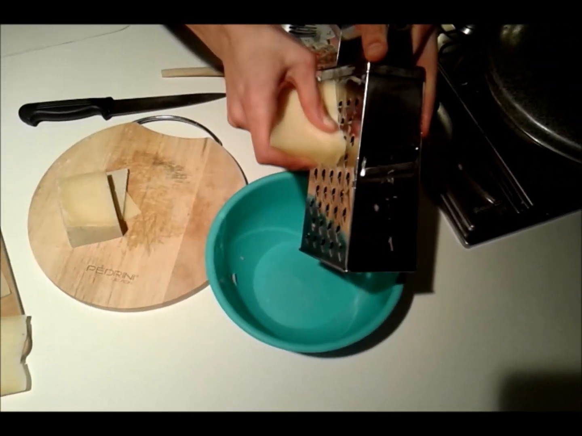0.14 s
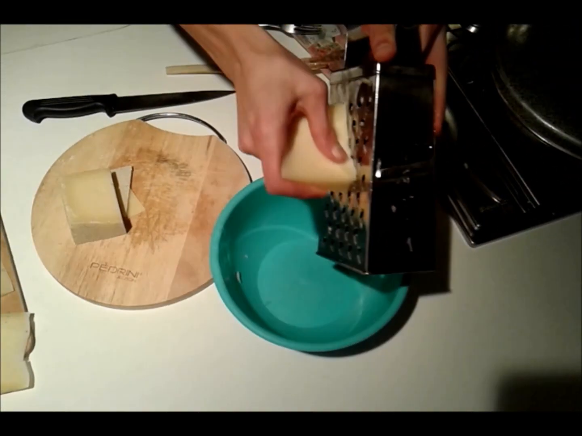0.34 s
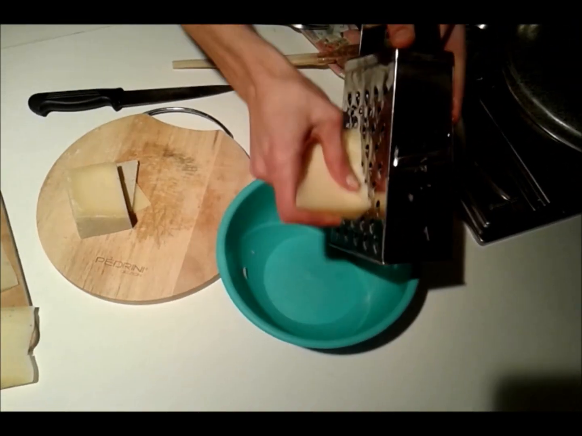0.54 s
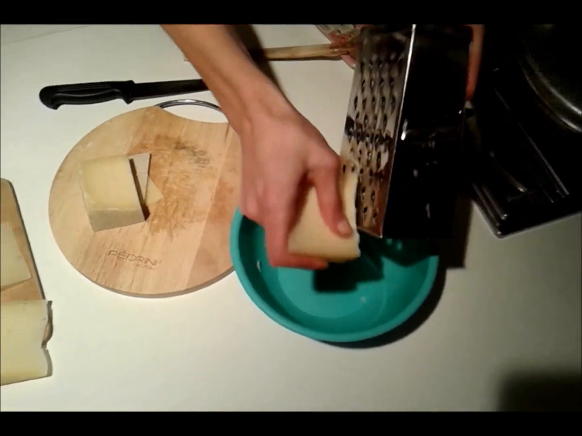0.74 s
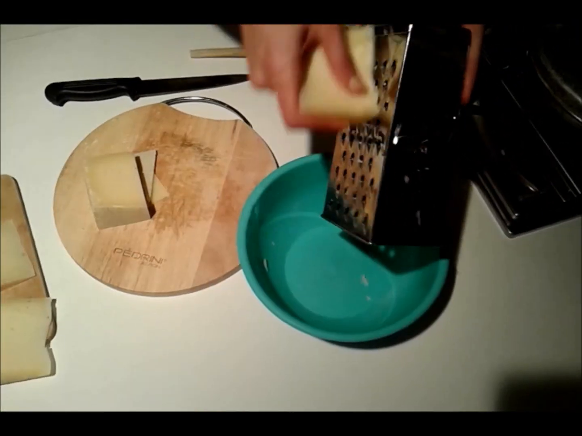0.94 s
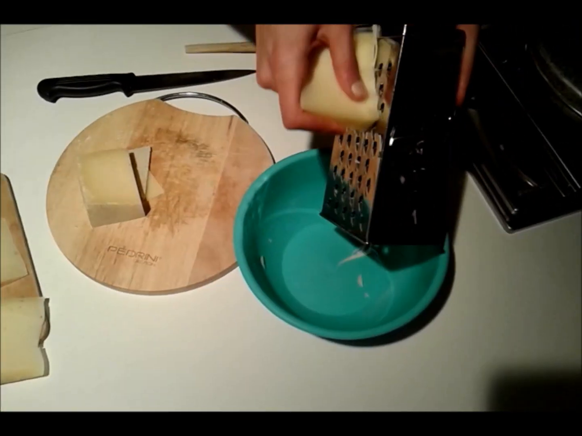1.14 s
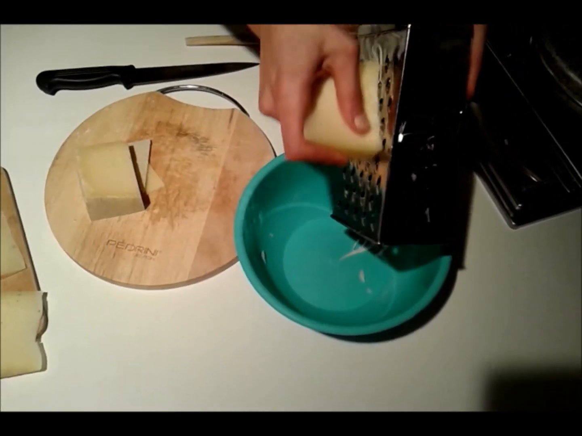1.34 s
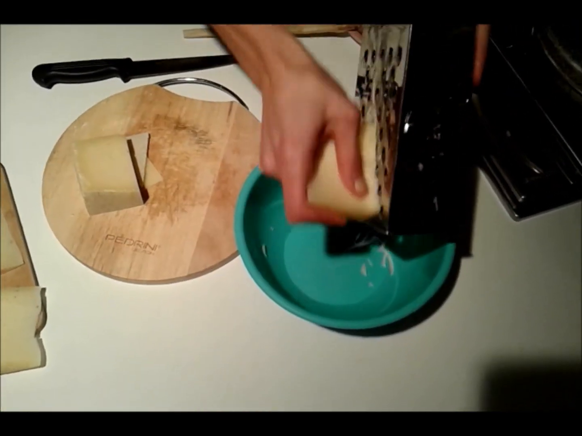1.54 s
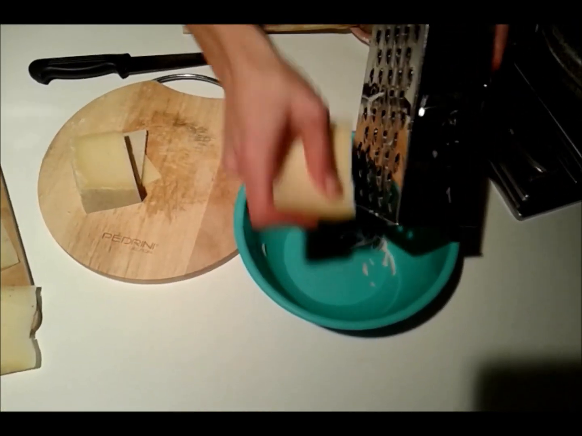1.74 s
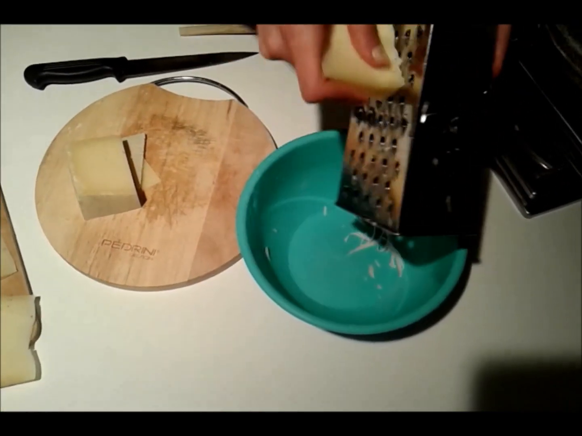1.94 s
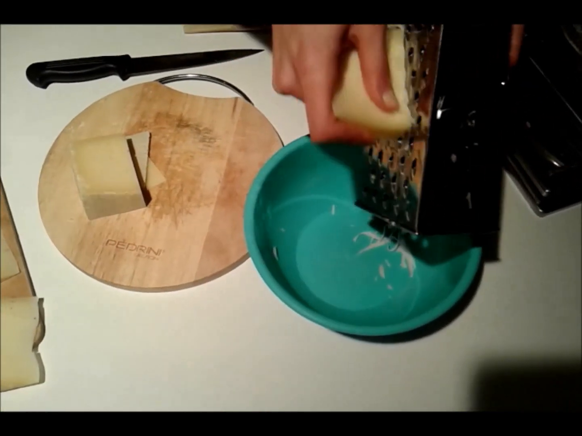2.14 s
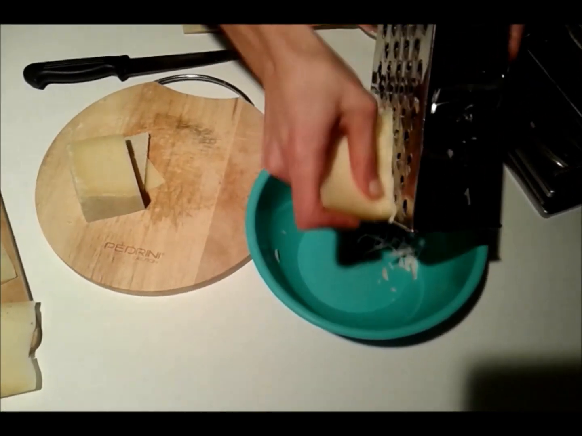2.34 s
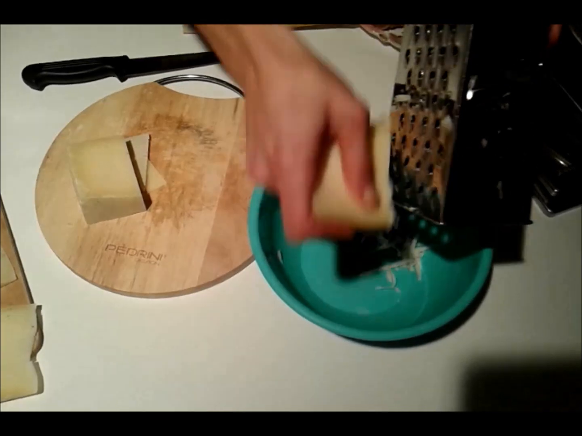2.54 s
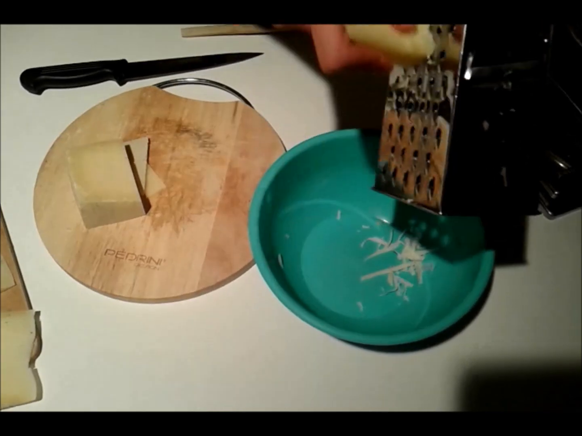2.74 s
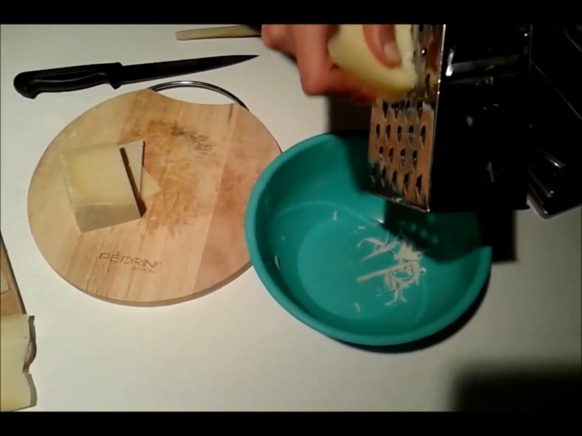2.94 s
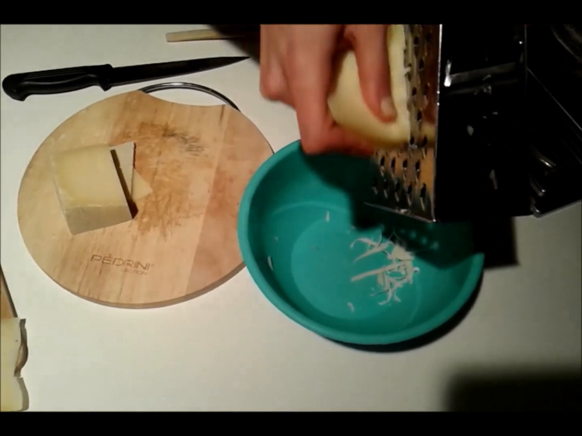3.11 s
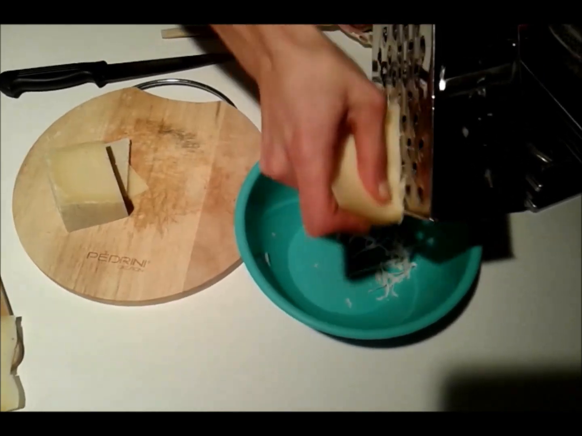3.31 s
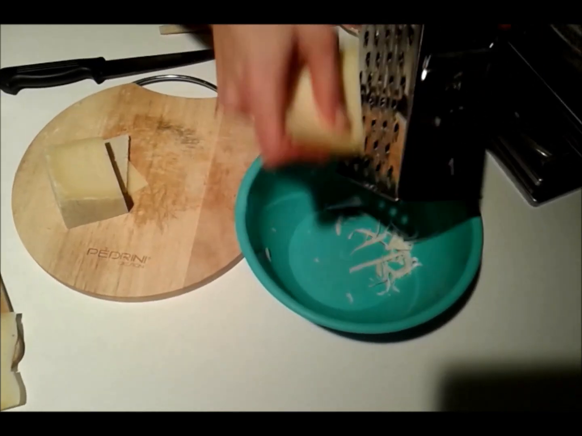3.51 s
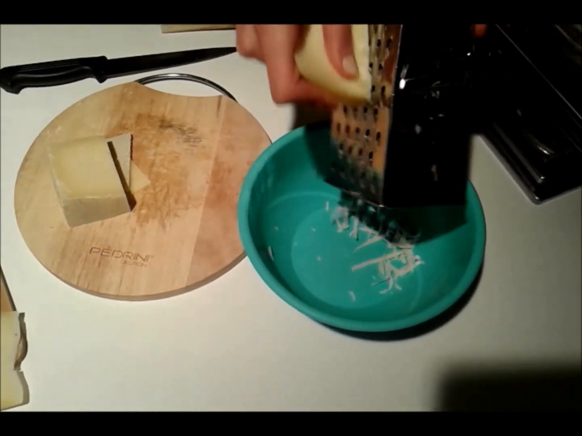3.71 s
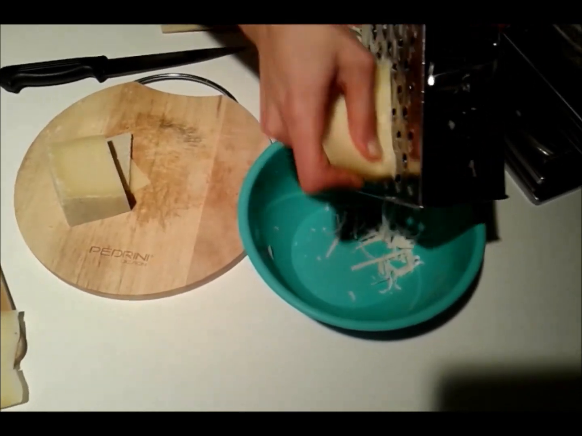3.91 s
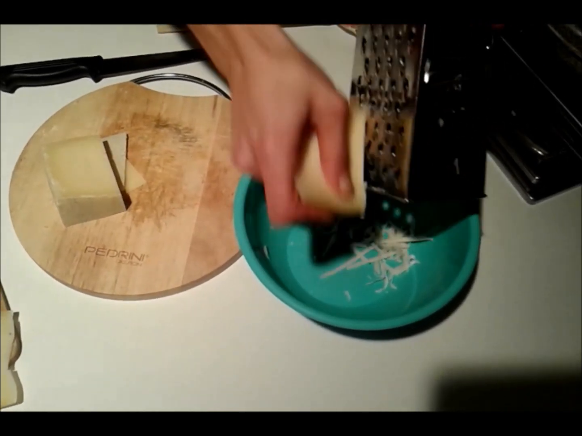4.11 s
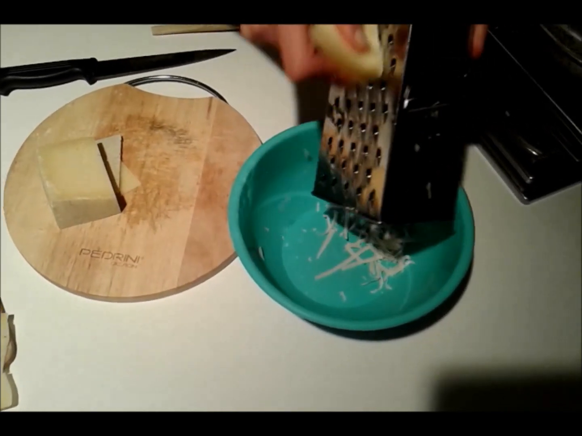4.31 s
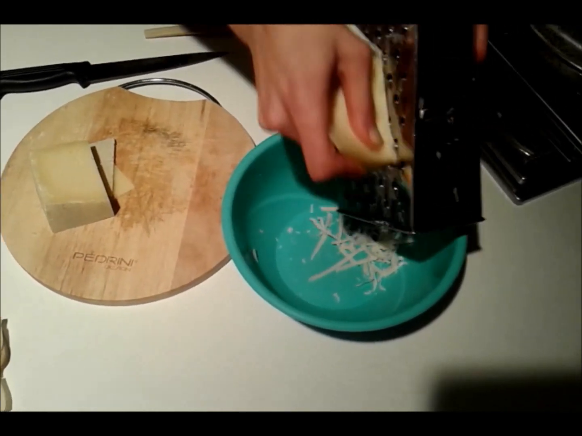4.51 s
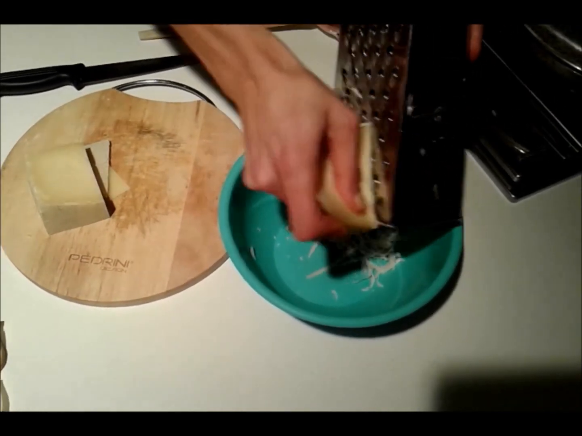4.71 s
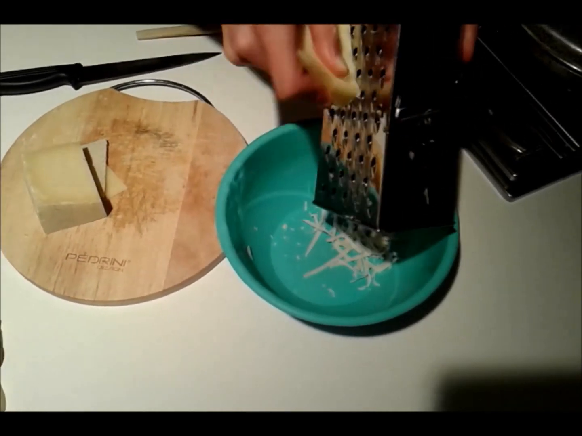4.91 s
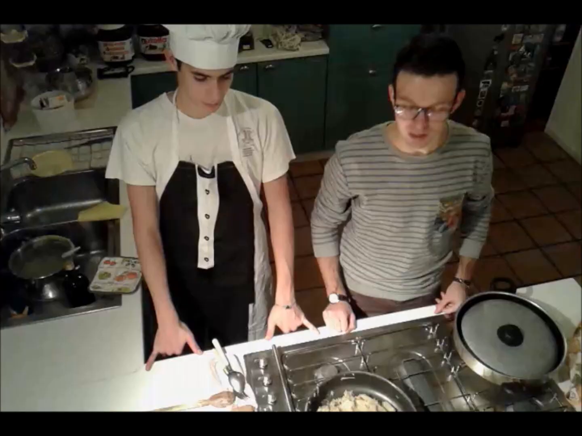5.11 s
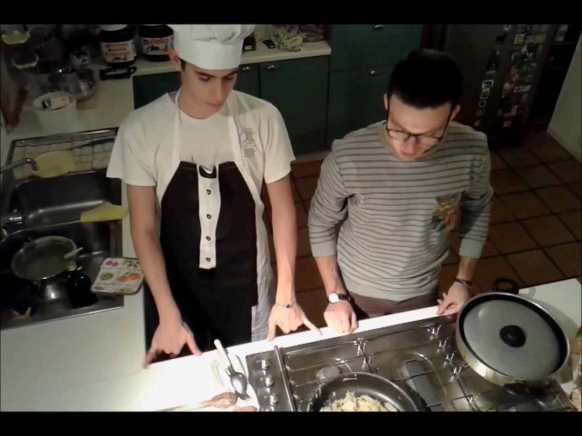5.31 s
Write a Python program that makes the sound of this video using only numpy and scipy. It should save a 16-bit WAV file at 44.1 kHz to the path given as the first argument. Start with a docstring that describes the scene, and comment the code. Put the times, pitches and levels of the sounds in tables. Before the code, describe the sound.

Hard cheese rasps down a steel grater in uneven strokes, with bright ticks and light knocks against a plastic bowl.

```python
"""A block of hard cheese is stroked down a steel box grater standing in a plastic bowl on a counter.
Crumbs break on the teeth in a fine rasp; the block catches and snaps free in bright ticks that ring
the steel, and now and then it splits with a thin crack. The side wall flexes with dull ticks and the
grater's foot knocks in the bowl. A small hard kitchen rings after each tick. Underneath lie a steady
hiss and two faint, brief tones; the sound stops abruptly in mid-stroke."""
import sys
import numpy as np
from scipy import signal
from scipy.fft import rfft, irfft
from scipy.io import wavfile
from scipy.ndimage import uniform_filter1d

SR = 44100
rng = np.random.default_rng(int(sys.argv[2]) if len(sys.argv) > 2 else 0)


def to_wav(s):
    """Save 16-bit WAV."""
    ch = np.atleast_2d(s).T  # columns
    pcm = np.round(np.clip(ch, -1, 1) * 32767)  # PCM
    wavfile.write(sys.argv[1], SR, pcm.astype(np.int16))


N = 240477
TIME = np.arange(N) / SR
EVENT_TIME = TIME[:SR // 4]  # time axis of one hit and its tail [s]
USUAL_DB = -40  # a typical catch: the reference for drag and smear levels


def undb(db):
    """Decibels to gain."""
    return 10 ** (np.asarray(db) / 20)


def unit(x):
    """Scale to rms 1."""
    return x / np.sqrt(np.mean(x ** 2))


def crest(x, size=128):
    """Scale so that the loudest stretch of `size` samples has rms 1."""
    return x / np.sqrt(uniform_filter1d(x ** 2, size).max())


def add(track, start_s, x):
    """Mix x into the track from start_s."""
    i = max(int(start_s * SR), 0)
    track[i:i + len(x)] += x[:N - i]


def through(x, response):
    """Pass x through an impulse response."""
    return signal.fftconvolve(x, response)[:len(x)]


def highpass(x, hz):
    """Second-order low cut."""
    return signal.sosfilt(signal.butter(2, hz, "high", fs=SR, output="sos"), x)


def low_noise(count, hz):
    """White noise rolled off above hz."""
    return signal.sosfilt(signal.butter(2, hz, fs=SR, output="sos"), rng.standard_normal(count))


def wander(count, hz):
    """Slow random modulation at rms 1."""
    return unit(low_noise(count, hz))


def colour(points, size=1024):
    """Minimum-phase impulse response of an EQ curve of (frequency [Hz], level [dB]) points."""
    hz, db = np.transpose(points)
    grid_hz = np.maximum(np.arange(size // 2 + 1) * SR / size, 1)
    gain = undb(np.interp(np.log(grid_hz), np.log(hz), db))
    cepstrum = irfft(np.log(gain))
    cepstrum[1:size // 2] *= 2
    cepstrum[size // 2 + 1:] = 0
    return irfft(np.exp(rfft(cepstrum)))


def ring(modes, gain_db=0, longest_t60_s=.14):
    """Decaying modes at rms 1; every ring dies quickly, with t60 capped at longest_t60_s."""
    hz, db, t60 = np.transpose(modes)
    phase = 2 * np.pi * (np.outer(EVENT_TIME, hz) + rng.random(len(hz)))
    fade = np.exp(-np.log(1000) * EVENT_TIME[:, None] / np.clip(t60, .005, longest_t60_s))
    return unit(np.sum(undb(db + gain_db) * np.sin(phase) * fade, axis=1))


def resonator(points, modes, ring_share):
    """Unit-energy impulse response of a part: a broad colour with its clearest modes ringing on."""
    broad = colour(points)
    broad = np.pad(broad, (0, len(EVENT_TIME) - len(broad)))
    return unit(unit(broad) + ring_share * ring(modes)) / np.sqrt(len(EVENT_TIME))


def steel(points, modes, ring_share, detune=.03):
    """The block loads a steel face at another place on each contact and shifts its modes."""
    shifted = np.array(modes, float)
    shifted[:, 0] *= 1 + detune * rng.standard_normal(len(modes))
    return resonator(points, shifted, ring_share)


def crumbs(count, per_s, spread_db):
    """Tiny fractures at random moments, a few much stronger than the rest."""
    breaks = rng.random(count) < per_s / SR
    polarity = rng.choice([-1, 1], count)
    return breaks * polarity * undb(spread_db * np.minimum(rng.exponential(size=count), 4))


# EQ of the background bed: (frequency [Hz], relative level [dB])
HISS_EQ = [(25, -5), (70, -9.5), (150, -9), (350, -5), (600, -6), (1200, -15), (3000, -17), (6000, -14.5),
           (8400, -9), (11000, -19.5), (16000, -21.5)]
def hiss(level_db=-70.5):
    """A faint, steady bed of coloured noise."""
    return undb(level_db) * unit(through(rng.standard_normal(N), colour(HISS_EQ)))


# tones under the first light rubs: (peak time [s], pitch [Hz], level [dB], half length [s])
TONE_CUES = [(0.199, 656, -64, 0.058), (0.52, 552, -62.5, 0.039)]
def faint_tones(waver_hz=18, waver_share=0.33):
    """Wavering sine tones swell and fade."""
    waver = 1 + waver_share * wander(N, waver_hz)
    out = np.zeros(N)
    for peak_s, hz, db, width_s in TONE_CUES:
        swell = np.exp(-((TIME - peak_s) / width_s) ** 2)
        out += undb(db) * np.sqrt(2) * np.sin(2 * np.pi * hz * TIME) * swell
    return waver * out


def kitchen(x, build_s=0.012, split_hz=2500, low_t60_s=0.3, high_t60_s=0.28, low_db=-12, high_db=-14.5):
    """Add dense reflections from tiles and cupboards, with their own decay for lows and highs."""
    lows = low_noise(SR, split_hz)
    highs = highpass(rng.standard_normal(SR), split_hz)
    t, response = TIME[:SR], 0
    for band, t60, db in (lows, low_t60_s, low_db), (highs, high_t60_s, high_db):
        fade = (1 - np.exp(-t / build_s)) * np.exp(-np.log(1000) * t / t60)
        response = response + undb(db) * band * fade / np.sqrt(np.sum(fade ** 2))
    return x + through(x, response)


# EQ of the bowl's thud: (frequency [Hz], relative level [dB])
BOWL_EQ = [(40, -47.5), (90, -19), (150, -4.5), (210, -15), (330, -14), (520, -0.5), (750, 0.5), (1100, -6),
           (1500, -2), (2300, -4.5), (5000, -18), (12000, -77.5)]
# the bowl's resonances: (frequency [Hz], relative level [dB], t60 [s], capped in ring())
BOWL_RING = [(285.2, -6.5, 0.079), (349.7, -10, 0.17), (386.7, -6.5, 0.14), (518, 4, 0.069),
             (541, -6, 0.33), (571, -5.5, 0.23), (670, -15.5, 0.054), (756, -22, 0.033), (800, 2, 0.02),
             (914, -9, 0.079), (984, -11.5, 0.07), (1071.3, 2, 0.059), (1200, -32.5, 0.042),
             (1553, -19, 0.2), (1402, -5.5, 0.09), (1745, -11, 0.18)]
def plastic_bowl():
    """The hollow response of the bowl with the grater standing in it."""
    return resonator(BOWL_EQ, BOWL_RING, ring_share=0.47)


# EQ of the side wall: (frequency [Hz], relative level [dB])
WALL_EQ = [(300, -46.5), (900, -5), (1500, -12.5), (2000, 6), (2500, 6.5), (3200, 6), (4200, 4),
           (5500, 2.5), (7500, 4), (10000, -17), (16000, -15)]
# the wall's resonances: (centre frequency [Hz], relative level [dB], t60 [s])
WALL_RING = [(2620, -30.5, 0.012), (2736, 17.5, 0.007), (3160, 2.5, 0.1), (3770, -4, 0.044),
             (4100, 4, 0.0067), (5300, 17.5, 0.017), (5506, 3.5, 0.01)]
def side_wall(ring_share=0.23):
    """The flat steel wall answers one contact with a short clank."""
    return steel(WALL_EQ, WALL_RING, ring_share)


# EQ of the teeth: (frequency [Hz], relative level [dB])
TEETH_EQ = [(1000, -42), (3000, -27), (4700, -17), (5800, -8), (6500, -7), (7400, -2.5), (8200, 0),
            (8850, -1), (9400, -7), (9900, -9), (10700, -15), (12000, -28), (16000, -37)]
# the punched face's resonances: (centre frequency [Hz], relative level [dB], t60 [s])
TEETH_RING = [(6450, -12, .04), (6660, -30.5, 0.1), (7640, 5, 0.03), (7900, 12.5, 0.029), (8300, 7, 0.076),
              (9300, 3, 0.12), (9570, -13, .04)]
def toothed_face():
    """The punched steel face answers one contact with a bright ping."""
    return steel(TEETH_EQ, TEETH_RING, ring_share=0.23)


def rasp(bowl, t, length_s, teeth_db, body_db, bowl_db=-3, grip_s=0.0054, release_s=0.011):
    """Cheese crumbles in small clumps over many teeth and shakes the body: side wall and bowl."""
    contact = (1 - np.exp(-t / grip_s)) * np.exp(-np.maximum(t - length_s, 0) / release_s)
    fractures = crumbs(len(t), per_s=4000, spread_db=2.5)
    clump_db = 1.5 * wander(len(t), hz=110)
    grains = contact * unit(fractures * undb(clump_db))
    teeth = through(grains * undb(teeth_db), toothed_face())
    body = through(grains * undb(body_db), side_wall() + undb(bowl_db) * bowl)
    # cheese smeared over flat steel adds an airy hiss that grows only slowly with the drag
    smear_db = -60 + 0.2 * (body_db - USUAL_DB)
    smear = contact * highpass(rng.standard_normal(len(t)), hz=6000) * undb(smear_db)
    return teeth + body + smear


def accent_db(hz, centre_hz, boost_db=8, width_octaves=0.8):
    """The place of contact favours the modes near one frequency."""
    return boost_db * np.exp(-(np.log2(hz / centre_hz) / width_octaves) ** 2)


# the grater's foot hits the bowl: (time [s], level [dB], accented frequency [Hz])
KNOCK_CUES = [(0.840, -40.5, 1040), (1.073, -39, 620), (1.228, -53.5, 870), (1.711, -46.5, 613),
              (2.063, -42, 380), (2.530, -51, 1130), (3.736, -33, 590), (3.916, -44, 920),
              (4.382, -38.5, 496), (4.678, -44.5, 376), (4.804, -37, 1500), (5.013, -28, 1000)]
def foot_knocks(bowl, chatter_db=-8.5, contact_s=.0034, press_s=0.031, tail_share=0.61, lead_s=.02):
    """The foot presses into the plastic: modes swell, the rim chatters, a weaker ring is left."""
    out = np.zeros(N)
    swell = 1 - np.exp(-EVENT_TIME / contact_s)
    press = np.exp(-(EVENT_TIME / press_s) ** 2)
    mode_hz = np.array(BOWL_RING)[:, 0]
    for at_s, db, centre_hz in KNOCK_CUES:
        modes = ring(BOWL_RING, accent_db(mode_hz, centre_hz)) * swell * (press + tail_share)
        rim = colour([(hz, eq_db + accent_db(hz, centre_hz)) for hz, eq_db in BOWL_EQ])
        chatter = through(rng.standard_normal(len(EVENT_TIME)) * swell * press, rim)
        knock = crest(modes, size=256) + undb(chatter_db) * crest(chatter, size=256)
        add(out, at_s - contact_s / 2, undb(db) * knock)
        # the block rubs lightly as the hand comes back up and rocks the grater
        rub = rasp(bowl, EVENT_TIME, length_s=0.047, teeth_db=-63.5, body_db=-62)
        add(out, at_s - lead_s, rub)
    return out


# dull ticks of the side wall: (time [s], level [dB])
FLEX_CUES = [(0.682, -46.5), (1.798, -37), (2.441, -48), (2.813, -57.5), (2.888, -38), (3.338, -32)]
def wall_flexes(band_hz=(2450, 4600), decay_s=0.0062):
    """The side wall gives a little under the hand and rings in its lower modes."""
    out = np.zeros(N)
    band = signal.butter(3, band_hz, "band", fs=SR, output="sos")
    for at_s, db in FLEX_CUES:
        slips = crumbs(len(EVENT_TIME), per_s=15000, spread_db=7.0) * np.exp(-EVENT_TIME / decay_s)
        tick = signal.sosfilt(band, through(slips, side_wall(ring_share=0.061)))
        add(out, at_s, undb(db) * crest(tick))
    return out


def crack(fade):
    """A burst of very high noise under the given fade."""
    return crest(highpass(rng.standard_normal(len(fade)) * fade, hz=9500))


# thin cracks in the cheese: (time [s], level [dB])
CRACK_CUES = [(2.289, -35), (2.626, -45), (3.959, -34)]
def cheese_cracks(decay_s=0.0077):
    """Now and then a piece of the hard block splits off."""
    out = np.zeros(N)
    for at_s, db in CRACK_CUES:
        add(out, at_s, undb(db) * crack(np.exp(-EVENT_TIME / decay_s)))
    return out


# the block slides along the face: (start [s], end [s], teeth level [dB], swell [dB], body level [dB])
SLIDE_CUES = [(0, 0.041, -56, -20, -67), (0.061, 0.186, -57.5, 3, -68.5), (0.199, 0.333, -74, 3, -88),
              (0.598, .68, -70.5, 23, -67.5), (0.766, 0.863, -45, 10, -50.5), (1.467, 1.638, -60.5, 5, -60),
              (2.091, 2.187, -72, 4, -80), (2.491, 2.541, -47.5, -4, -54.5), (2.836, 2.903, -56.5, 3, -61),
              (3.676, 3.865, -57, -2, -59), (3.86, 3.992, -53.5, -6, -51), (4.001, 4.177, -60, 5, -60),
              (4.199, 4.354, -58.5, -3, -64.5), (4.467, 4.592, -54.5, -6.5, -62),
              (4.654, 5.006, -55, 4, -55.5), (5.015, 5.139, -47.5, -2, -46)]
def slides(bowl, uneven_db=3.0, uneven_hz=22, body_follow=0.55):
    """The hand's pressure swells or slackens along a slide and wavers as rows of teeth pass."""
    out, t = np.zeros(N), TIME[:SR * 3 // 4]
    for start_s, end_s, teeth_db, swell_db, body_db in SLIDE_CUES:
        length_s = end_s - start_s
        progress = np.minimum(t / length_s, 1)
        press_db = swell_db * (progress - .5) + uneven_db * wander(len(t), uneven_hz)
        add(out, start_s, rasp(bowl, t, length_s, teeth_db + press_db, body_db + body_follow * press_db))
    return out


def drag(bowl, catch_db, wall_db, drag_s, lead_s, teeth_ease_db_per_s=78.5, body_ease_db_per_s=26.5):
    """The teeth cut on, harder after a harder catch, and the rasp eases as the cheese gives."""
    since_s = EVENT_TIME - lead_s
    teeth_db = -49.5 + 0.55 * (catch_db - USUAL_DB) - teeth_ease_db_per_s * since_s
    body_db = -52.5 + 0.53 * (wall_db - USUAL_DB) - body_ease_db_per_s * since_s
    pressing_in = since_s < 0  # a light rub just before the catch
    teeth_db[pressing_in], body_db[pressing_in] = -61, -56
    return rasp(bowl, EVENT_TIME, lead_s + drag_s, teeth_db, body_db, bowl_db=-5.5)


def snap(bowl, teeth_db, wall_db, slip_s=0.0034, doubling_db=20, wall_hold=1.78, bowl_hold=2.1):
    """The block lets go with a crack and a volley of slips that rings teeth, side wall and bowl."""
    # a jolt to the wall is one short snap; the volley lengthens as the teeth take over
    volley_s = slip_s * 2 ** ((teeth_db - wall_db) / doubling_db)
    fade = np.exp(-EVENT_TIME / volley_s)
    slips = crumbs(len(EVENT_TIME), per_s=4000, spread_db=3.5)
    slips[0] = 2.63  # a strong first slip gives a hard attack
    light_bowl = highpass(bowl, hz=423)  # so light a blow hardly moves the lowest modes
    tick = crest(through(slips * fade, toothed_face()))
    clank = crest(through(slips * fade ** (1 / wall_hold), side_wall(ring_share=0.47)))
    thud = crest(through(slips * fade ** (1 / bowl_hold), light_bowl), size=256)
    top = tick + undb(-25) * crack(fade)
    body = undb(-1) * clank + undb(-10) * thud
    return undb(teeth_db) * top + undb(wall_db) * body


# the block catches on the teeth: (time [s], teeth level [dB], wall drive [dB], drag length [s])
CATCH_CUES = [(0.497, -40, -43, 0.016), (0.505, -47, -44, .005), (0.685, -40, -38.5, 0.038),
              (0.792, -52, -46, 0.075), (0.856, -38, -38, 0.037), (1.232, -41.5, -28.5, .022),
              (1.386, -61, -64.5, 0.019), (1.485, -41, -50.5, .02), (1.511, -41, -45.5, 0.002),
              (1.566, -44, -52.5, 0.0066), (1.617, -17.5, -28, 0.13), (1.621, -20, -35, .005),
              (1.777, -34, -37.5, 0.028), (1.797, -36.5, -29.5, 0.045), (1.921, -59, -54.5, 0.019),
              (2.289, -20, -37.5, 0.19), (2.438, -55, -39, 0.016), (2.549, -64, -39, 0.012),
              (2.646, -52, -41.5, 0.018), (2.743, -47.5, -67, 0.0086), (2.851, -44, -58, 0.0051),
              (2.889, -43.5, -40, 0.0072), (2.995, -40.5, -51.5, 0.0048), (3.051, -54, -67.5, .02),
              (3.1733, -16, -40, .15), (3.266, -31, -39, 0.0067), (3.336, -26, -28, 0.073),
              (3.484, -41, -42.5, 0.032), (3.618, -42.5, -52, .008), (3.703, -49, -42.5, .01),
              (3.734, -39.5, -49, 0.0027), (3.757, -36.5, -39.5, 0.017), (3.957, -31, -49, 0.013),
              (4.15, -43.5, -52, 0.012), (4.232, -35, -38.5, 0.0035), (4.497, -41.5, -47, 0.021),
              (4.656, -45.5, -61, .01), (4.677, -38, -43, 0.058), (4.759, -41.5, -46.5, 0.017),
              (4.897, -35, -34.5, 0.031), (4.922, -24.5, -29.5, .004), (4.9448, -30.5, -39, 0.0046),
              (5.013, -37.5, -32, .02), (5.092, -34.5, -56, 0.071)]
def catches(bowl, lead_s=.011):
    """Stick and slip: the block presses in, snaps free of the teeth and drags on."""
    out = np.zeros(N)
    for at_s, teeth_db, wall_db, _ in CATCH_CUES:
        add(out, at_s, snap(bowl, teeth_db, wall_db))
    for at_s, teeth_db, wall_db, drag_s in CATCH_CUES:
        add(out, at_s - lead_s, drag(bowl, teeth_db, wall_db, drag_s, lead_s))
    return out


def scene():
    """Grating in the kitchen over a faint bed, in mono."""
    bowl = plastic_bowl()
    bed = hiss()
    grater = catches(bowl) + slides(bowl) + cheese_cracks() + wall_flexes() + foot_knocks(bowl)
    grater = highpass(grater, hz=55.0)  # small parts radiate no deep bass
    return (kitchen(grater) + faint_tones() + bed)[None]


def record(dry, end_s=5.165, top_hz=16000):
    """The sound is switched off abruptly, and a steep low-pass cuts the top."""
    gate = uniform_filter1d((TIME < end_s) * 1., size=128)
    top_cut = signal.ellip(10, .2, 80, top_hz, fs=SR, output="sos")
    return signal.sosfilt(top_cut, dry * gate)


dry = scene()
out = record(dry)
to_wav(out)
```